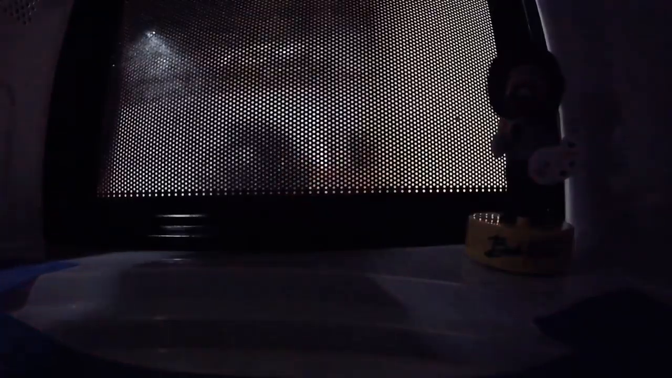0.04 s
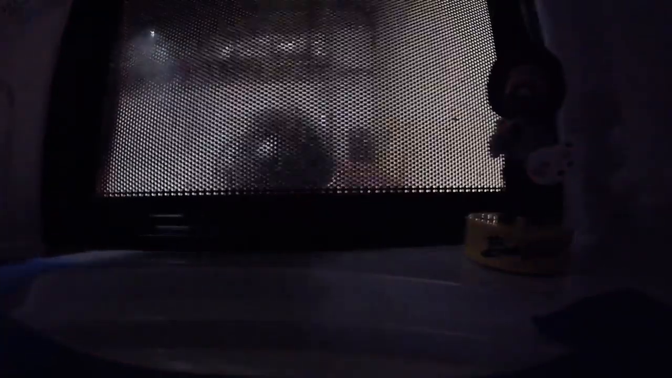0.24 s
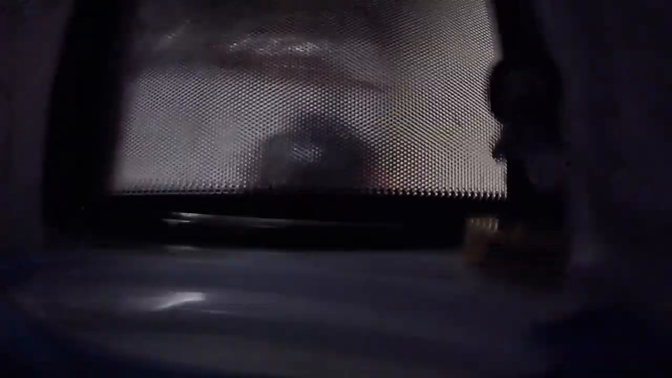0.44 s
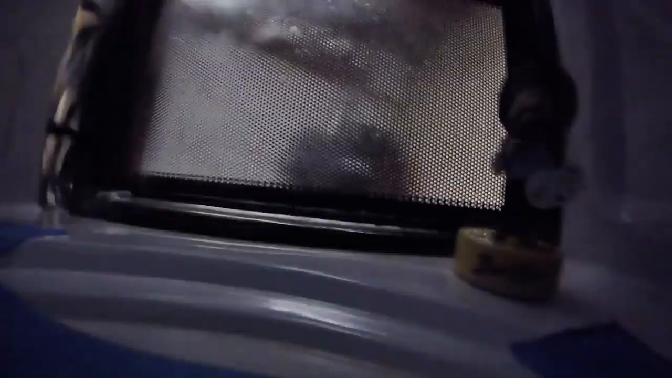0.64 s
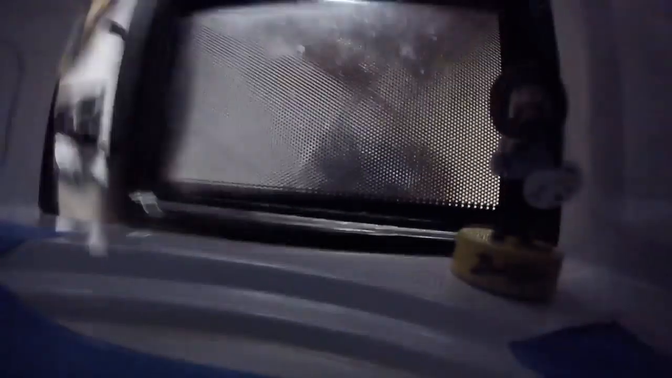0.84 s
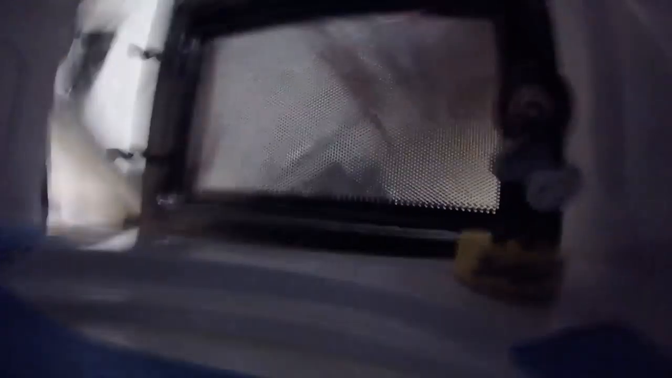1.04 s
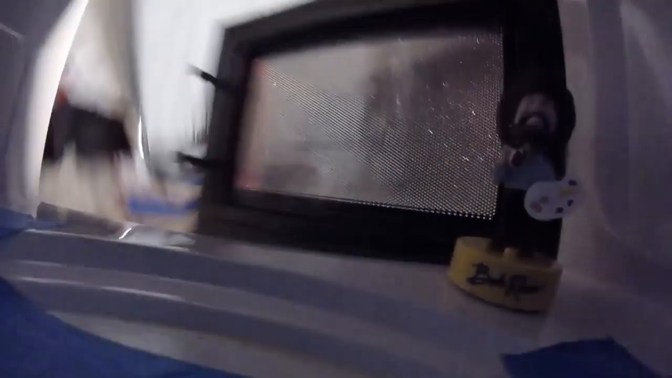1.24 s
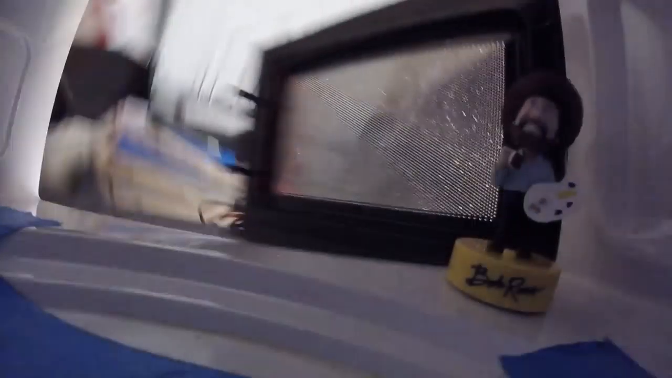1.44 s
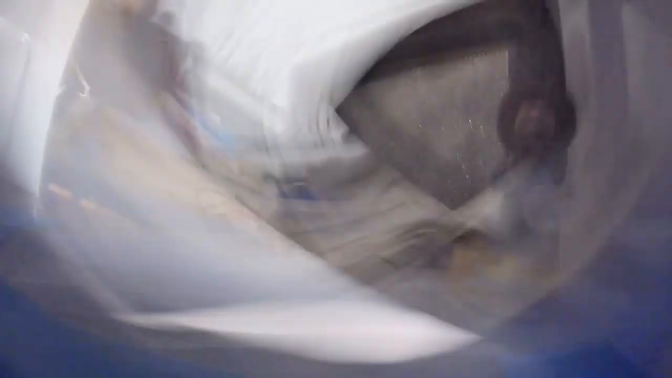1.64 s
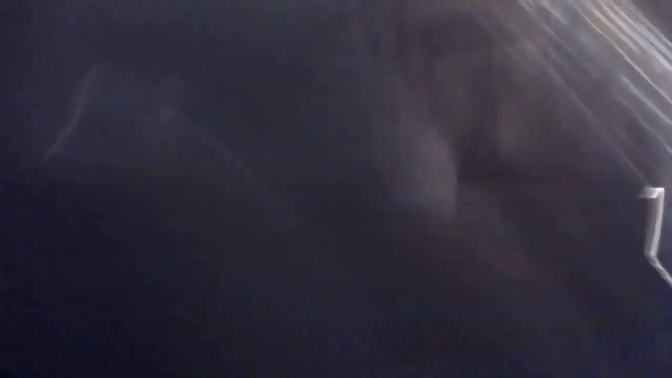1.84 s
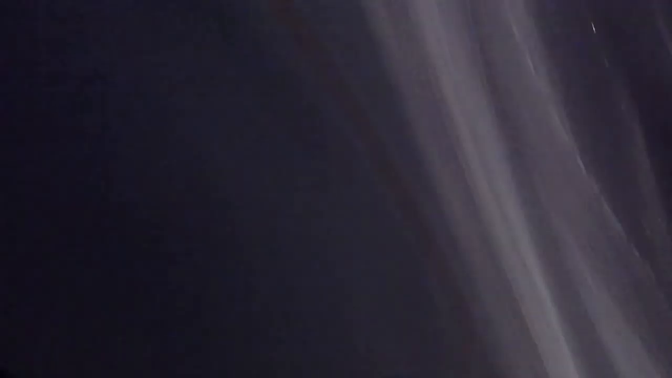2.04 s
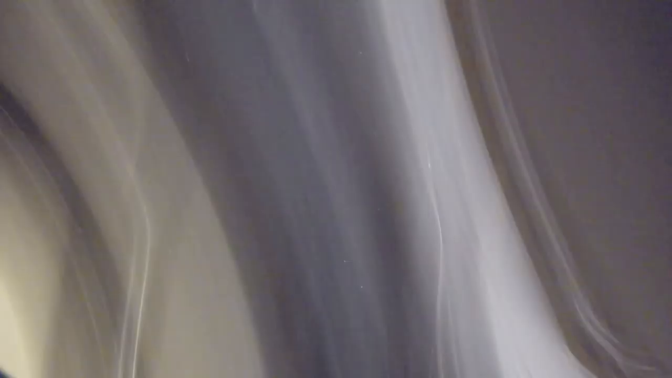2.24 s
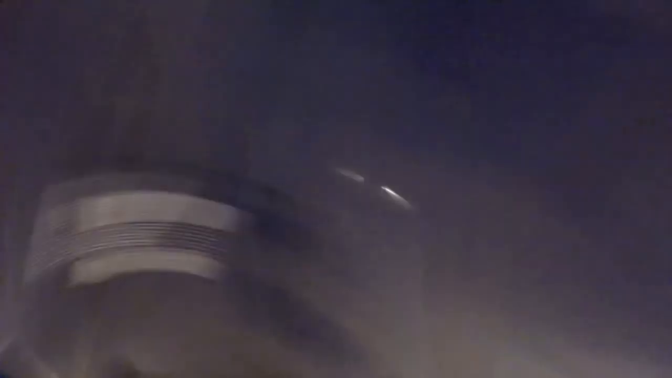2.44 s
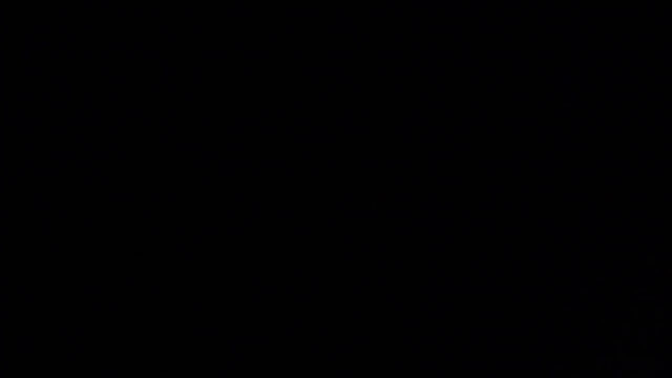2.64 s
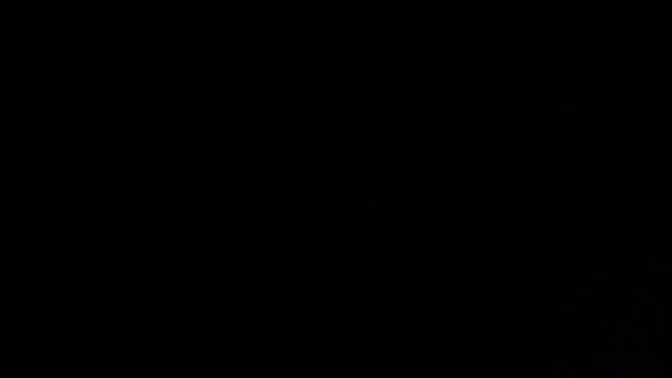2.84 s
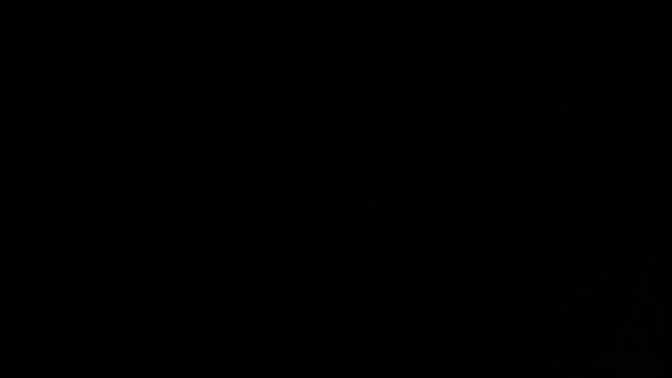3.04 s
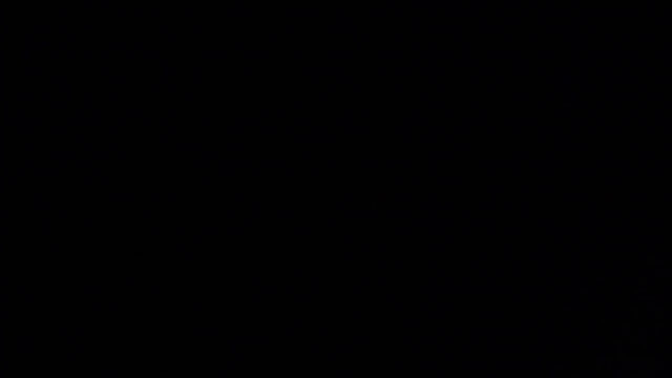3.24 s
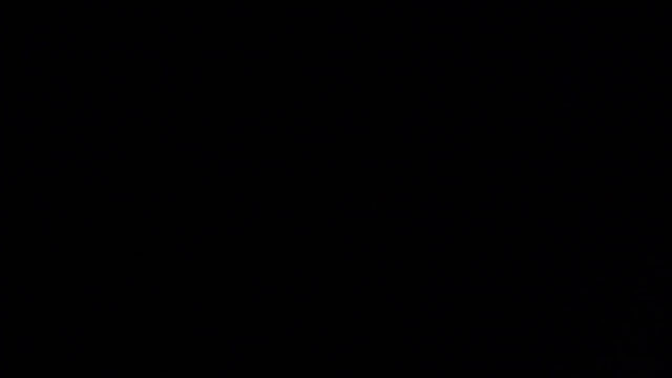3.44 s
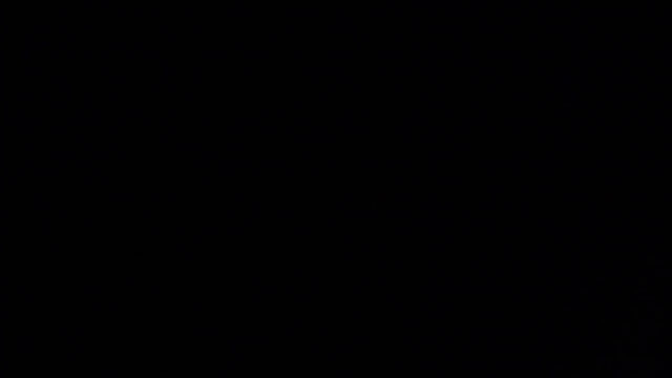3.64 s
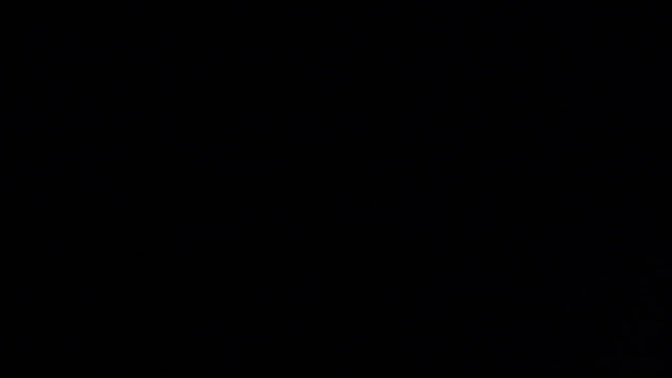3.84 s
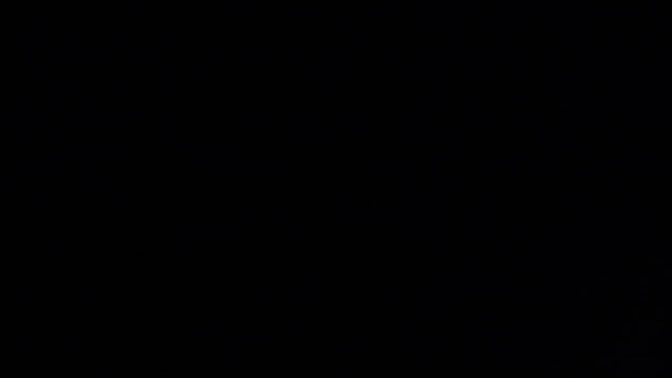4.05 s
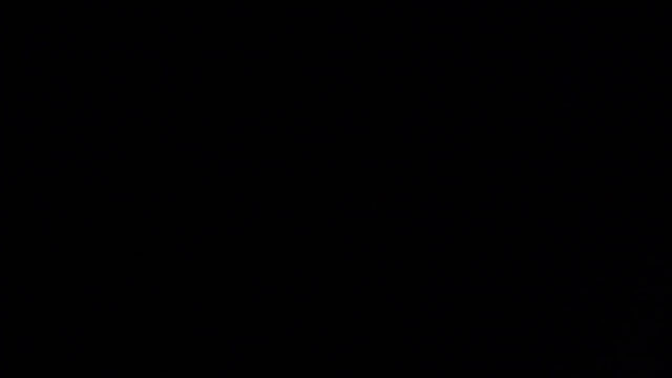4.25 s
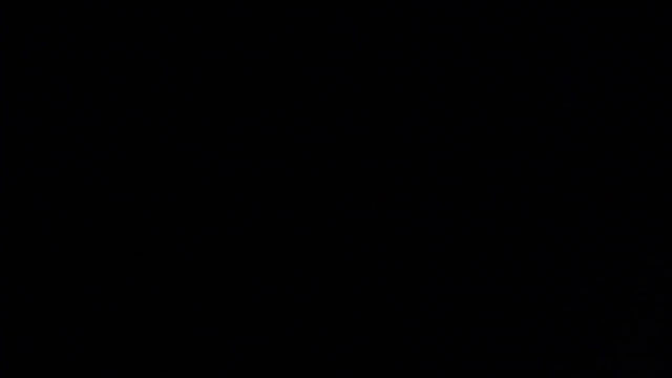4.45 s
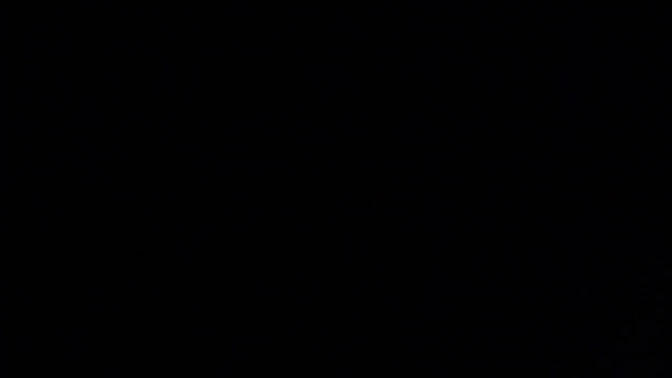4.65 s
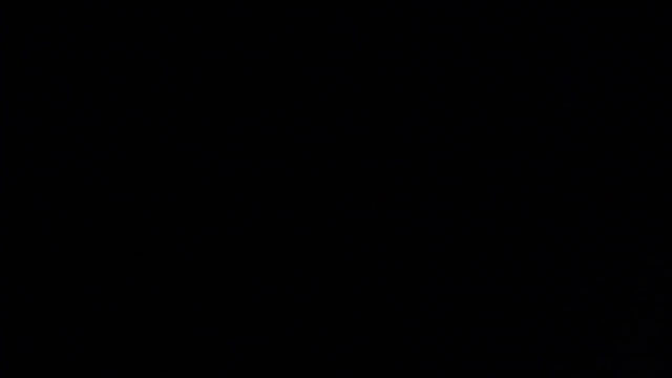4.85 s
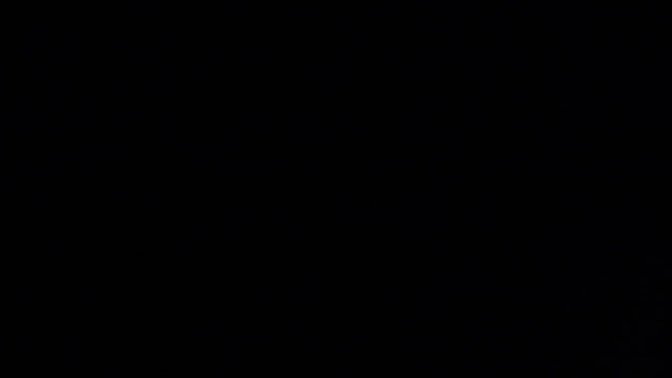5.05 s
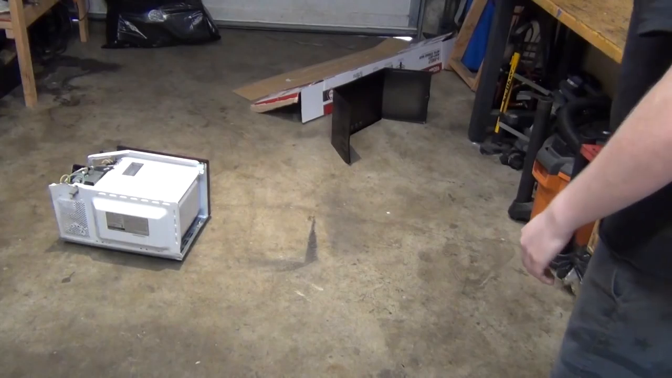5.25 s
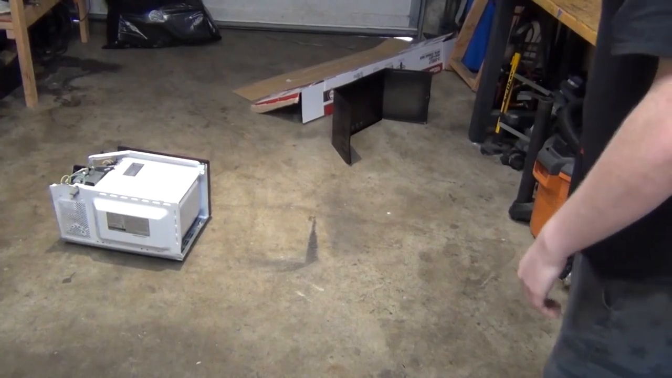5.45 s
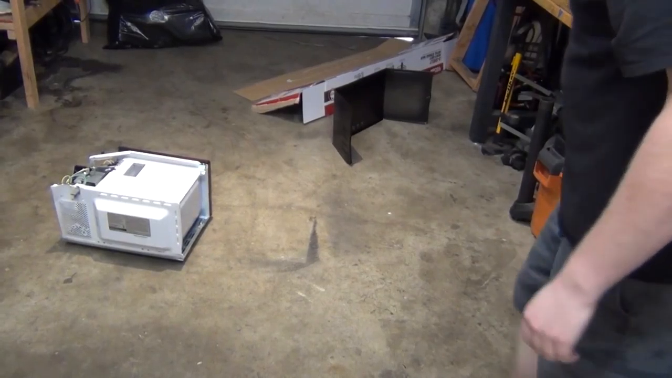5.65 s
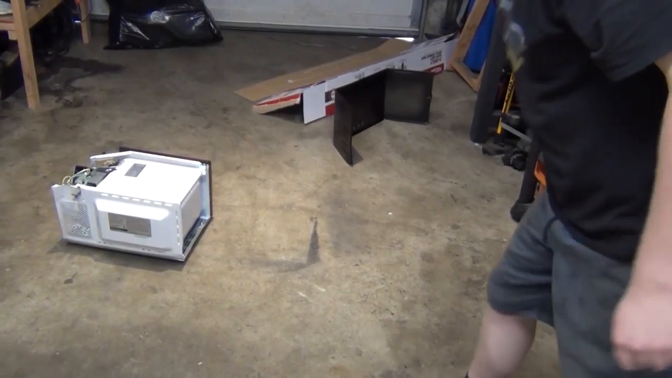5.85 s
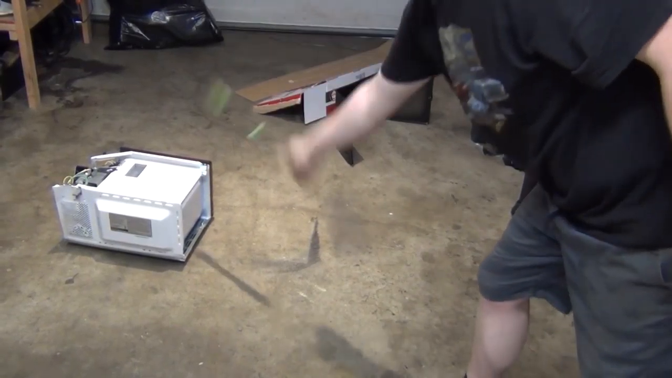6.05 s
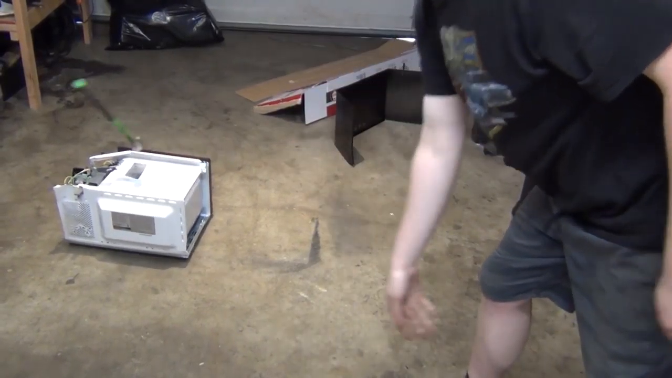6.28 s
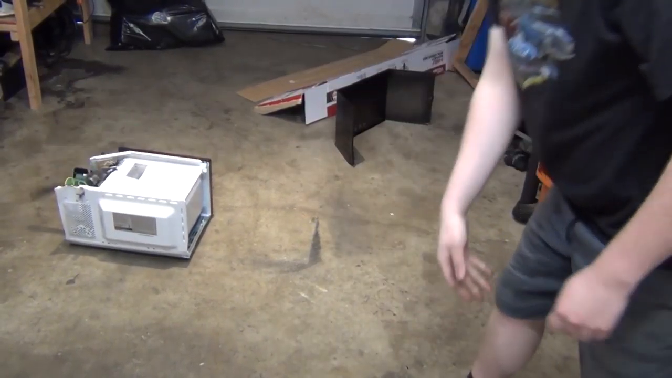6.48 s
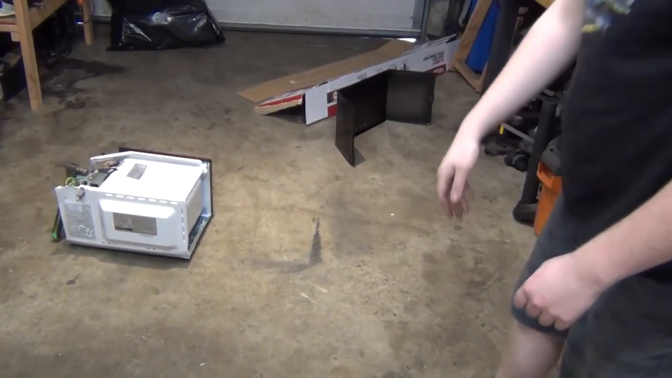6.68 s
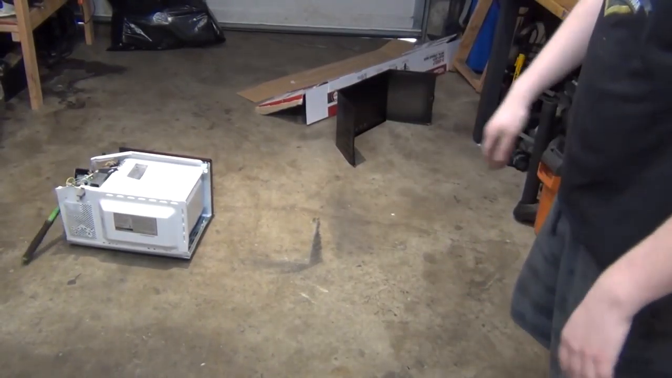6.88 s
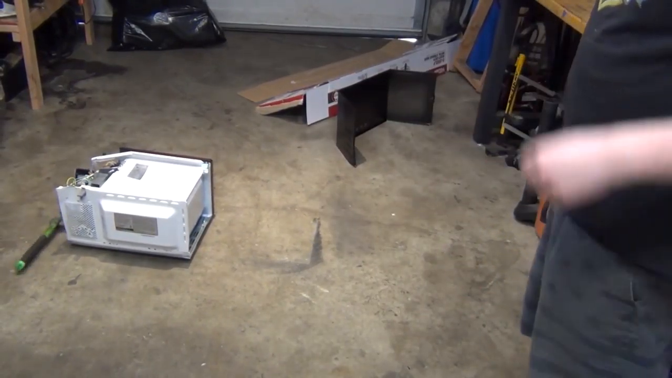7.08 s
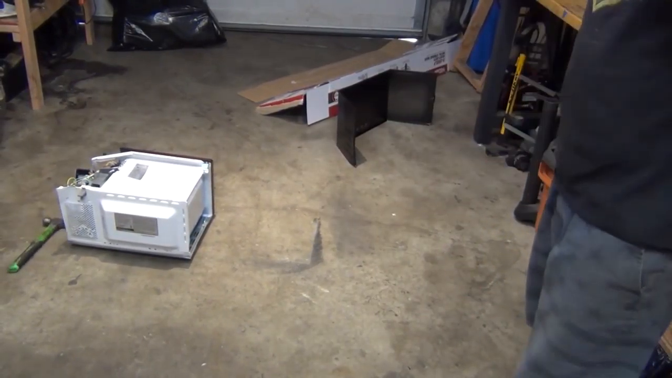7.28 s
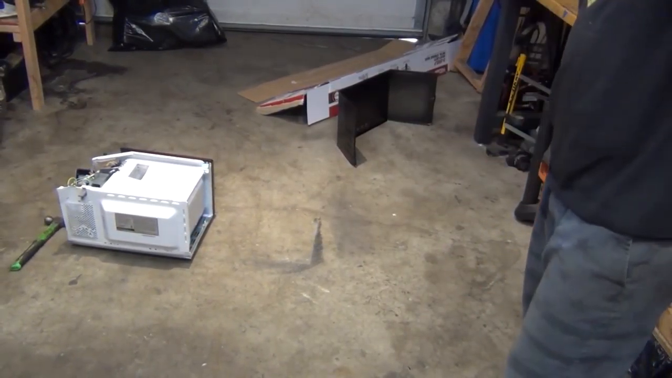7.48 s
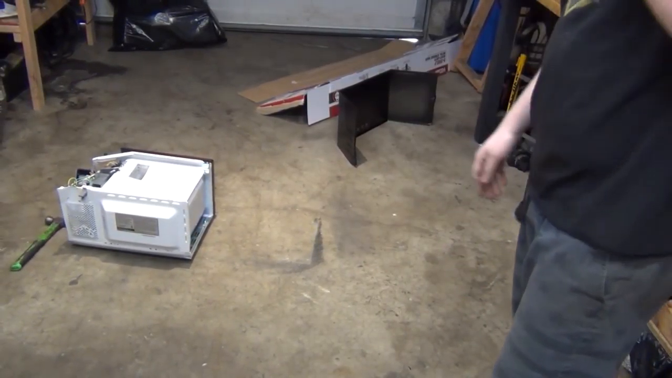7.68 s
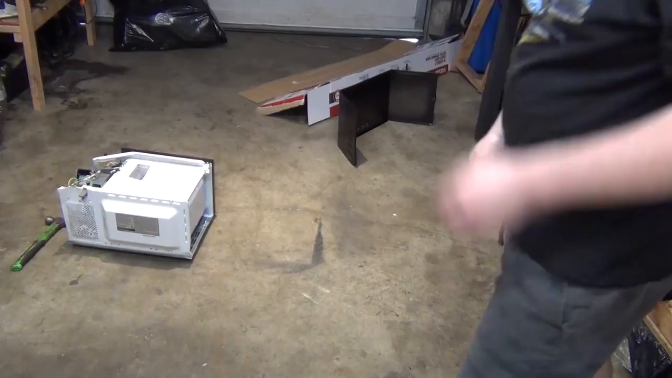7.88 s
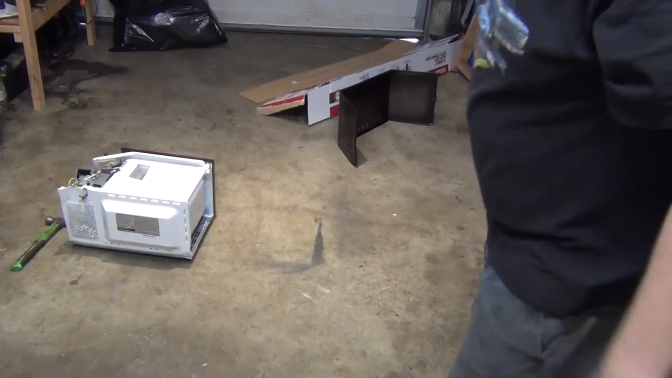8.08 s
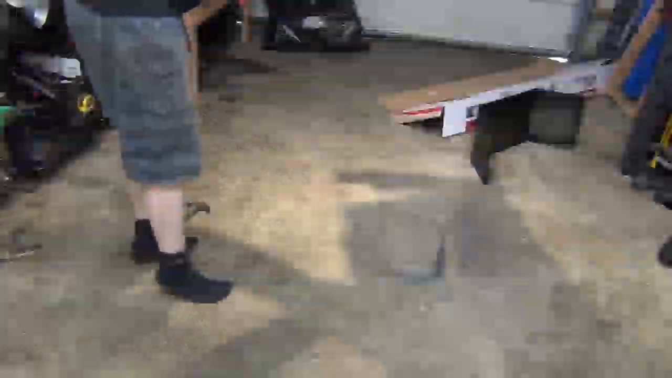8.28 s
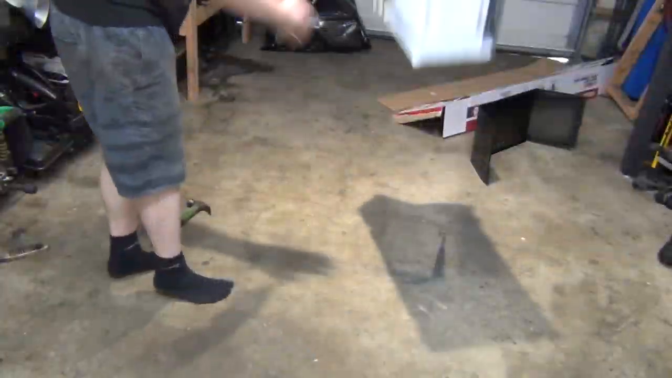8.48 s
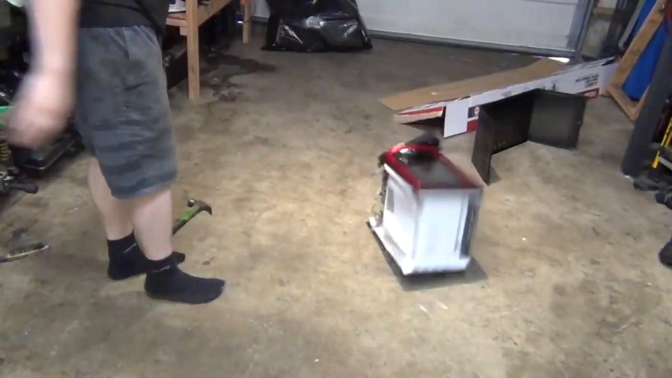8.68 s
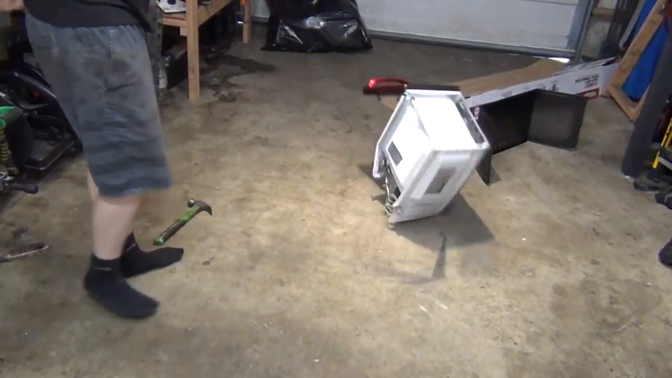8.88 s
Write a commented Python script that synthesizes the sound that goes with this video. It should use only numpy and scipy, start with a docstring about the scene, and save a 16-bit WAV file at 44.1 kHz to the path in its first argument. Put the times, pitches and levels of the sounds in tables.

```python
"""A hammer wrecks a sheet-metal oven in a garage, in short, hard-cut shots. First we ride a small camera
tumbling inside the oven, slowed down and dark: panels crumple, the hull booms, the housing gets knocked.
At 2.7 s the blows reach full speed and glass tinkles down. From 3.4 s we are outside, muffled, as the
thrown hammer bounces and rings on the concrete. At 5.2 s the sound opens up: the flipped hammer head
sings, socks scuff and more blows clang, until the oven is dropped at 8.3 s."""
import sys
import numpy as np
from scipy import signal
from scipy.fft import rfft, irfft, next_fast_len
from scipy.io import wavfile
from scipy.ndimage import uniform_filter1d

SR = 44100
rng = np.random.default_rng(int(sys.argv[2]) if len(sys.argv) > 2 else 0)


def log_audio(samples):
    """Write samples as a 16-bit WAV file to the path given in sys.argv[1]."""
    # one column per channel
    frames = np.atleast_2d(samples).T
    # limit to full scale, then quantise
    limited = np.clip(frames, -1, 1)
    pcm = np.round(limited * 32767).astype(np.int16)
    wavfile.write(sys.argv[1], SR, pcm)


N = 393372
HOP, FFT_SIZE = 32, next_fast_len(N + 4096)  # samples; envelopes move one hop a frame
BIN_HZ = np.fft.rfftfreq(FFT_SIZE, 1 / SR)

# blows and rattles inside the oven: (time [s], level [dB], bass [dB], treble [dB], t60 [ms])
INSIDE_BLOWS = [(0.001, -16.5, -8, 2, 1500), (0.198, -12.5, -12.5, 0.5, 430), (0.386, -11, 0, 1, 200),
                (0.402, -4.5, 4, -3.5, 430), (0.471, -7.5, 2.5, -12.5, 270),
                (0.579, -11.5, -0.5, 17.5, 160), (0.898, -20.5, -8.5, 4, 290),
                (0.924, -4.5, -4.5, 5.5, 370), (1.158, -14, -1, -12, 210), (1.249, -22, -2.5, 27, 270),
                (1.365, -17.5, -2.5, 37.5, 62), (1.708, -12.5, -14.5, 5, 260), (1.74, -10.5, 7, 15, 220),
                (1.897, -14.5, 15, -17, 180), (1.993, -9, -6, 16, 330), (2.034, -17, 1.5, -7, 260),
                (2.217, -17, -12.5, 11.5, 590), (2.284, -17, 3.5, 10, 200), (2.374, -16.5, 10, -23, 130),
                (2.439, -10.5, -10.5, 4, 100), (2.477, -3.5, -2, 1.5, 184), (2.778, -31, 4.5, -12, 370),
                (2.832, 3.5, 1, -3, 170), (2.879, -7.5, -8.5, -11.5, 710), (3.074, -20.5, 1.5, -3, 820),
                (3.239, -28, -17, -6, 100)]
# blows and bounces outside:
# (time [s], level [dB], bass [dB], treble [dB], t60 [ms], clang pitch [Hz], clang against level [dB])
OUTSIDE_BLOWS = [(3.45, -7.5, 14, -10.5, 470, 845, -23), (3.53, -11, -19, -12, 520, 2150, -11),
                 (3.725, -41, -4, 13, 180, 2740, -24), (3.759, -8, 6.5, -15.5, 590, 1577, -16),
                 (3.838, -13.5, -23, -13.5, 530, 2010, -11), (4.157, -17, 12.5, -15.5, 370, 1980, -3),
                 (4.235, -29, 15.5, -23, 680, 3060, -7), (4.455, -18.5, 17.5, -34, 460, 1610, -10),
                 (4.576, -7.5, 4.5, -4.5, 410, 3030, -8), (4.599, -9.5, 3, -5, 410, 2750, -10),
                 (4.683, -16.5, 13, 12.5, 410, 2490, -2.5), (4.768, -14, 3, -2.5, 640, 2800, -8),
                 (4.885, -23.5, 10.5, -8, 850, 2930, -10), (5.216, -1, 0.5, -18, 437, 999, -30),
                 (6.177, 9, 5, 4.5, 640, 1640, -35), (6.34, -4.5, 4, 1.5, 1040, 980, -24),
                 (6.562, -3.5, 11.5, 3.5, 670, 763, -11.5), (6.679, -8, 2.5, 2, 660, 1020, -30),
                 (6.879, -4.5, 4.5, 2, 510, 717, -12.5), (7.103, 2.5, -6, -5, 643, 1096, -16.5),
                 (7.264, -14, -6, -14, 170, 2070, -21), (7.37, -12, 2, 2.5, 690, 2860, -28),
                 (7.46, -14.5, 7, 6, 220, 2340, -29), (7.518, -14.5, -3, 4.5, 495, 2840, -14),
                 (8.034, -29, -3, -9.5, 160, 1110, -16.5), (8.285, -14, -3, 3.5, 1450, 1565, -19),
                 (8.312, 0.5, -8, -11, 420, 2180, -17.5), (8.522, -22, 14, 11.5, 1000, 1075, -8.5),
                 (8.552, -5.5, 16.5, 0, 750, 1900, -6.5), (8.693, -10, 15, -3.5, 1300, 2370, -7),
                 (8.747, 8, 14.5, 3.5, 870, 1153, -15)]


def gain_of(db):
    """Decibels to gain."""
    return 10 ** (np.asarray(db) / 20)


def unit_rms(x):
    """Scales to rms 1."""
    return x / np.sqrt(np.mean(x ** 2) + 1e-20)


def curve_at(points, hz):
    """Reads (Hz, value) points on a log-frequency axis."""
    point_hz, value = np.transpose(points)
    return np.interp(np.log(hz + 1), np.log(point_hz + 1), value)


def filtered(x, gain):
    """Applies one gain per frequency bin."""
    return irfft(rfft(x, FFT_SIZE) * gain, FFT_SIZE)[:N]


def coloured(x, points):
    """EQ through (Hz, dB) points, scaled so that white noise keeps its level."""
    return filtered(x, unit_rms(gain_of(curve_at(points, BIN_HZ))))


def add(mix, at, sound):
    """Mixes a sound in at a sample or frame index."""
    part = mix[..., round(at):][..., :sound.shape[-1]]
    part += sound[..., :part.shape[-1]]


def drone(peaks):
    """Noise through a few resonances."""
    gain = sum(gain_of(db) / (1 + (2 * (BIN_HZ - hz) / width) ** 2) for hz, width, db in peaks)
    return unit_rms(filtered(rng.standard_normal(N), gain))


def swells(pushes, rise_s):
    """Envelope of pushes that rise fast and die away."""
    t, power = np.arange(2 * SR) / SR, np.zeros(N)
    for s, db, t60 in pushes:
        add(power, s * SR, (gain_of(db - 60 * t / t60) * (1 - np.exp(-t / rise_s))) ** 2)
    return np.sqrt(power)


def wavering(hz, power, waver):
    """Sounds tones from their power per frame; echoes make each one waver."""
    a, b = uniform_filter1d(uniform_filter1d(rng.standard_normal((2,) + power.shape), 16), 16)
    swing = np.sqrt(power) * (1 - waver + waver * (unit_rms(a) + 1j * unit_rms(b)) / np.sqrt(2))
    carrier = np.exp(2j * np.pi * np.reshape(hz, (-1, 1)) * np.arange(power.shape[1] * HOP) / SR)
    return (np.repeat(swing, HOP, 1) * carrier).real.sum(0)


def struck_modes(hz, db, t60, blows, spread_db, waver):
    """Every blow (s, dB) strikes the same modes, each time in another place."""
    t, start = np.arange(1000) * HOP / SR, blows[0][0]
    power, out = np.zeros((len(hz), round((N / SR - start) * SR / HOP) + 1)), np.zeros(N)
    decay = gain_of(db[:, None] - 60 * t / t60[:, None]) * (1 - np.exp(-t / 0.0033))
    for (s, blow_db), place in zip(blows, rng.standard_normal((len(blows), len(hz)))):
        add(power, (s - start) * SR / HOP, (gain_of(blow_db + spread_db * place)[:, None] * decay) ** 2)
    add(out, start * SR, wavering(hz, power, waver))
    return out


def noise_beds():
    """A noise bed per perspective; in the slowed one, the oven's contents slide after each blow."""
    # EQ curves of the first four perspectives: (frequency [Hz], level [dB])
    bed_curves = [
        [(76, -45.5), (130, 2), (166, -10.5), (233, 2), (269, -11.5), (376, -4.5), (590, -10.5), (1090, -14.5),
         (1390, -22), (1860, -12), (2180, -21.5), (2350, -29), (3530, -44.5), (4200, -58), (5460, -91),
         (9240, -120)],
        [(24, -35), (40, -14), (262, -6), (364, -28), (3400, -23), (4610, -18), (9330, -37.5), (11000, -53),
         (14300, -65), (22000, -120)],
        [(18, -38), (30, 5), (173, -1), (249, 7.5), (302, 1), (1300, -12), (2830, -54), (4940, -14),
         (10000, -28), (13000, -57), (22000, -120)],
        [(12, -49), (20, -30), (117, -2), (178, -15.5), (250, 2), (313, -8.5), (463, -1.5), (518, -7.5),
         (2790, -23.5), (14600, -38), (16300, -32)],
    ]
    slowed, inside, dull, bright = (coloured(rng.standard_normal(N), curve) for curve in bed_curves)
    sliding = swells([(s, db - 15.5, 0.95) for s, db, *_ in INSIDE_BLOWS], rise_s=0.0088)
    return [slowed * sliding, inside, dull, bright, bright]


def garage_hum():
    """The faint, wavering drone of the garage."""
    # resonances: (frequency [Hz], width [Hz], level [dB])
    hum_peaks = [(119, 6.7, 0.5), (240, 26, 4.5), (462, 25, 1)]
    return gain_of(-55) * drone(hum_peaks)


def hull_boom():
    """The slowed oven booms each time it rocks."""
    # rocking pushes: (time [s], level [dB], t60 [s])
    rocks = [(0.03, -20.5, 0.81), (0.185, -12, 0.74), (0.39, -8, 1.05), (0.915, -13.5, 1.26),
             (1.17, -26, 3), (1.52, -21, 0.38), (1.72, -14.5, 0.53), (1.88, -23.5, 2.2), (2.37, -29, 8.6)]
    # hull resonance: (frequency [Hz], width [Hz], level [dB])
    hull = [(66, 66, 0)]
    return swells(rocks, rise_s=0.016) * drone(hull)


def housing_knocks():
    """A knock on the camera gives one low push and a faint ring of its housing."""
    # knocks: (time [s], level [dB], pitch [Hz], direction of the first swing [+1 or -1])
    knocks = [(1.764, -3, 72.5, 1), (1.895, 1.5, 101, -1), (1.911, 2, 199, -1), (1.926, -3.5, 124, 1),
              (2.378, -3.5, 140, -1), (2.444, -12, 90, 1)]
    out, t = np.zeros(N), np.arange(4000) / SR
    for s, db, hz, direction in knocks:
        push = direction * np.sin(2 * np.pi * hz * t) * np.exp(-1.3 * hz * t)
        ring = gain_of(-33.5 - 60 * t / 0.14) * np.sin(2 * np.pi * 430 * t)
        add(out, s * SR, gain_of(db) * (push + ring))
    return out


def falling_glass():
    """Each shard ticks and chimes briefly around its own pitch."""
    # landings: (time [s], level [dB], pitch [Hz])
    shards = [(3.0298, -13, 5330), (3.0733, -18.5, 5570), (3.114, -14, 5100), (3.161, -13, 5330),
              (3.2377, -22, 5750), (3.2825, -15, 5160), (3.335, -20.5, 5800), (3.3628, -32, 4740),
              (3.379, -23, 5530)]
    out, t = np.zeros(N), np.arange(1500) / SR
    for (s, db, hz), noise in zip(shards, rng.standard_normal((len(shards), len(t)))):
        chime = unit_rms(signal.lfilter(*signal.iirpeak(hz, 4, SR), noise)) * np.exp(-t / 0.013)
        tick = np.diff(noise, prepend=0) * np.exp(-t / 0.0041)
        add(out, s * SR, gain_of(db) * (0.27 * chime + 0.14 * tick))
    return coloured(out, [(1500, 11.5), (8000, -13), (10000, -14), (11000, -56)])


def hammer_flip():
    """Six clean tones of the steel head swell and dip as it turns, ever more slowly."""
    # head tones: (pitch [Hz], level [dB], t60 [s], start angle [turns], gain facing away [0-1])
    head_tones = [(2030, -40.5, 1.8, 0.0049, 0.65), (5000, -39, 0.58, 0.01, .7),
                  (5313, -26, 0.7, -0.06, .12), (8700, -36, .45, .28, 0.5), (9910, -27.5, 0.49, .22, 0.45),
                  (13430, -54, .42, -0.05, .5)]
    out, t = np.zeros(N), np.arange(0, 0.88, 1 / SR)
    turns = 1.104 * (1 - np.exp(-t / 0.16))
    bloom = np.sqrt(2) * (1 - np.exp(-t / 0.062)) * signal.windows.tukey(len(t), 0.04)
    for hz, db, t60, angle, away in head_tones:
        decay = gain_of(db - 60 * (t / t60) ** 1.83)  # dies ever faster
        facing = np.hypot(away, np.sin(2 * np.pi * (turns + angle)))
        add(out, 5.24 * SR, bloom * decay * facing * np.sin(2 * np.pi * hz * t))
    return out


def hammer_clinks():
    """The hammer rings on the concrete; each landing favours one of its modes."""
    # steel modes: (pitch [Hz])
    mode_hz = [1604, 2040, 2690, 3120, 3650, 4845, 4975, 5308, 6686, 7903, 8600]
    # the same modes: (level [dB], t60 [s])
    modes = [(-12, 0.48), (-14, 0.4), (-3.5, 0.44), (-8.5, 0.36), (-6, 0.36), (-7.5, 0.55), (-1.6, 0.46),
             (-16, 0.65), (-14.5, 0.51), (-14.5, 0.56), (-11, 0.15)]
    # landings: (time [s], level [dB], high modes over low [dB], favoured mode [Hz])
    clinks = [(3.452, -25, -5, 4845), (3.53, -22, -16, 4845), (3.764, -19, -4, 1604),
              (3.842, -26, -4, 3650), (4.158, -27, -5, 3060), (4.457, -34, -1, 4845),
              (4.578, -18, -13, 4975), (4.595, -11, 3, 7903), (4.687, -15.5, 2, 6686),
              (4.77, -25, -7, 4975), (4.887, -23.5, -7, 2690), (5.215, -29.5, 1.5, 2040),
              (6.682, -30, 6, 2690), (6.879, -24.5, -18, 3120), (7.106, -19.5, -6, 2690),
              (7.371, -19, -4, 4975), (7.463, -16, -2, 7903), (7.521, -24.5, -2, 2690)]
    hz, blows = np.array(mode_hz), []
    for s, db, tilt_db, struck_hz in clinks:
        tilt = curve_at([(3000, -tilt_db / 2), (7900, tilt_db / 2)], hz)
        accent = 6.5 * np.exp(-(np.log(hz / struck_hz) / 0.022) ** 2)
        blows.append((s, db + tilt + accent))
    return struck_modes(hz, *np.transpose(modes), blows, spread_db=1.5, waver=0.72)


def steel_cracks():
    """Steel first touches a hard face: a bright spike of about a millisecond."""
    # contacts: (time [s])
    contacts = [6.178, 6.564, 7.107, 7.373, 7.461, 8.317, 8.554, 8.695]
    out, t = np.zeros(N), np.arange(200) / SR
    band = signal.butter(2, [1800, 6000], "band", fs=SR)
    for s, noise in zip(contacts, rng.standard_normal((len(contacts), len(t)))):
        spike = signal.lfilter(*band, noise * np.exp(-t / 0.0007))
        add(out, s * SR, gain_of(-3) * spike / abs(spike).max())
    return out


def oven_clangs():
    """Each blow rings the oven's panels and adds its own clang tone with a lower partner."""
    # panel modes: (pitch [Hz], level [dB], t60 [s])
    panels = [(322, -5.5, 0.65), (690, -26.5, 0.54), (690, -25, 0.93), (867, 0.5, 0.59), (954, -16, 0.36),
              (1200, -12, 0.88)]
    blows = [(s, db + clang_db - 9) for s, db, *_, clang_db in OUTSIDE_BLOWS]
    out = struck_modes(*np.transpose(panels), blows, spread_db=-2.5, waver=0.5)
    t_ms, pair_db = 1000 * np.arange(400) * HOP / SR, np.array([[0], [-0.5]])
    for s, db, _, _, t60, hz, clang_db in OUTSIDE_BLOWS:
        power = gain_of(db + clang_db + pair_db - 60 * t_ms / t60) ** 2 * (1 - np.exp(-t_ms / 9.6))
        add(out, s * SR, wavering([hz, 0.83 * hz], power, waver=0.49))
    return out


def clatter(bursts, room_db):
    """Crumpling metal: dense noise bursts whose top end dies first, over the tail of the room."""
    # decay across the spectrum: (frequency [Hz], t60 scale [factor])
    decay_scale = [(150, 0.89), (1000, 1.04), (4000, 1.094), (8000, 0.72), (16000, 0.48)]
    # garage reverb: (frequency [Hz], t60 [s])
    room_t60 = [(150, 0.79), (1000, 0.52), (5000, 0.56), (16000, 0.19)]
    hz, t = np.fft.rfftfreq(4 * HOP, 1 / SR)[:, None], np.arange(1000) * HOP / SR
    power = np.zeros((len(hz), N // HOP + 4))
    room = gain_of(room_db - 60 * t / curve_at(room_t60, hz)) ** 2 * (1 - np.exp(-t / 0.015))
    for s, level_db, bass_db, treble_db, t60_ms, rise_ms, *band in bursts:
        db = level_db + curve_at([(250, bass_db), (1500, 0.0086), (8000, treble_db)], hz)
        if band:
            band_hz, band_db = band
            db = db + band_db * np.exp(-(np.log((hz + 1) / band_hz) / 0.69) ** 2)
        decay = gain_of(-60 * 1000 * t / (t60_ms * curve_at(decay_scale, hz))) ** 2
        attack = 1 - np.exp(-(1000 * t + 0.1) / rise_ms)
        add(power, s * SR / HOP, (gain_of(db) * attack) ** 2 * (decay + room))
    a, b, grit = rng.standard_normal((3, power.shape[1], len(hz))).transpose(0, 2, 1)
    noise, frames = a + 1j * b, dict(nperseg=4 * HOP, noverlap=3 * HOP)
    chatter_db = unit_rms(uniform_filter1d(uniform_filter1d(grit, 24, 0), 6, 1))  # loose parts
    noise_peak = 3 * np.std(signal.istft(noise[:, :500], **frames)[1])
    return signal.istft(np.sqrt(power) * gain_of(chatter_db) * noise, **frames)[1][:N] / noise_peak


def sheet_metal(x, ripple_db):
    """Hundreds of close modes: narrow random peaks and dips that ring only after the blow."""
    ripple = uniform_filter1d(uniform_filter1d(rng.standard_normal(len(BIN_HZ)), 240), 240)
    echoes = irfft(ripple_db * unit_rms(ripple) * np.log(10) / 20, FFT_SIZE)
    echoes[1:FFT_SIZE // 2] *= 2  # folding onto positive delays makes the filter causal
    echoes[FFT_SIZE // 2 + 1:] = 0
    gain = np.exp(rfft(echoes))
    return filtered(x, gain / np.sqrt(np.mean(abs(gain) ** 2)))


def crumple_inside(rise_ms=1.2):
    """The panels buckle and rattle all around us."""
    blows = [(*blow, rise_ms) for blow in INSIDE_BLOWS]
    return sheet_metal(clatter(blows, room_db=-15.5), ripple_db=3)


def crumple_outside(blow_rise_ms=1.7, scuff_rise_ms=18.4, lift_db=3.5, scuff_bass_db=-8):
    """Blows crunch around their clang pitch; between them socks scuff on the concrete."""
    # scuffs: (time [s], level [dB], treble [dB], t60 [ms], band centre [Hz], band gain [dB])
    scuffs = [(5.571, -27.5, -9, 570, 2070, 8.5), (5.789, -26, 7.5, 290, 4000, -4.5),
              (6.065, -41, 28, 570, 6000, -6), (7.77, -43, 19, 260, 7000, -1),
              (8.048, -40.5, 10.5, 330, 7000, 5.5)]
    bursts = [(*blow, blow_rise_ms, hz, lift_db) for *blow, hz, _ in OUTSIDE_BLOWS]
    bursts += [(s, db, scuff_bass_db, treble, t60, scuff_rise_ms, *band)
               for s, db, treble, t60, *band in scuffs]
    return sheet_metal(clatter(bursts, room_db=-16), ripple_db=2)


def scene():
    """Each shot hears the sources from its own perspective; the cuts are abrupt."""
    # shots: (start [s], end [s], perspective [index])
    # 0 inside slowed, 1 inside, 2 outside dull, 3 outside bright, 4 outside for the drop
    shots = [(0, 1.615, 0), (1.703, 2.715, 0), (2.715, 2.79, 1), (2.829, 3.449, 1), (3.449, 5.215, 2),
             (5.215, 8.283, 3), (8.283, 9, 4)]
    # noise bed of each shot: (level [dB])
    bed_levels = [0, -3.5, -90, -47.5, -56, -46, -28.5]
    # EQ curve of the crumple for each perspective: (frequency [Hz], level [dB])
    crumple_curves = [
        [(76, -20.5), (130, 5), (265, -8.5), (302, 2), (335, -8.5), (416, -4), (474, -8), (766, -8.5),
         (836, -12), (1410, -17.5), (1700, -12), (2120, -19.5), (2380, -30), (3790, -50), (4200, -58),
         (5460, -86), (9240, -120)],
        [(24, -67), (40, -26), (92, -9), (166, -6), (260, -3.5), (322, -12), (398, -6.5), (555, -13.5),
         (870, -13.5), (3780, -25.5), (5520, -16.5), (9740, -44.5), (11500, -63), (15000, -102), (22000, -120)],
        [(35, -25), (60, -15), (467, -8.5), (1410, -10.5), (1600, -1.5), (2260, -4), (2810, 1.5), (3410, -4),
         (4930, 3), (6820, -13.5), (7270, -37), (8100, -25), (10500, -64), (13600, -76), (22000, -120)],
        [(24, -51), (40, -28), (101, -34.5), (130, -8.5), (264, -10), (339, -2), (561, -9.5), (637, -9.5),
         (1880, -7.5), (5010, -14.5), (14100, -31), (16300, -46)],
        [(24, -50), (40, -28), (245, -12.5), (561, -9), (861, -7), (1030, -6.5), (1570, -3), (4640, -6.5),
         (14800, -21.5), (16300, -48)],
    ]
    # muffling of the rings in the dull perspective: (frequency [Hz], gain [dB])
    dull_curve = [(4000, -9.5), (6500, -6.5), (8000, -18), (10000, -12)]
    t = np.arange(N) / SR
    inside, outside = crumple_inside(), crumple_outside()
    crumples = [coloured(x, curve) for x, curve in zip([inside] * 2 + [outside] * 3, crumple_curves)]
    rings = hammer_clinks() + oven_clangs() + steel_cracks()
    muffled = filtered(rings, gain_of(curve_at(dull_curve, BIN_HZ)))
    hum = garage_hum()
    details = [hull_boom() + housing_knocks(), falling_glass(),
               muffled + hum, rings + hammer_flip() + hum, rings + hum]
    beds = noise_beds()
    out = gain_of(-10.5) * hum * (t < 2.829)  # a trace of hum bridges the gaps between early shots
    for (start, end, view), bed_db in zip(shots, bed_levels):
        gate = np.clip(np.minimum(t - start, end - t) / 0.00073 + 0.5, 0, 1)
        out += gate * (crumples[view] + details[view] + gain_of(bed_db) * beds[view])
    return out[None]


def record(dry):
    """The loudest blows overload the input; the slowed shots have a lower band limit."""
    ceiling, knee = 0.85, 5
    slowed_hz, full_hz, slowed_end_s = 3950, 16400, 2.715
    clipped = dry / (1 + abs(dry / ceiling) ** knee) ** (1 / knee)
    lowpasses = (signal.firwin(511, hz, window=("kaiser", 9), fs=SR) for hz in (slowed_hz, full_hz))
    slowed, full = (signal.oaconvolve(clipped, taps[None], "same") for taps in lowpasses)
    return np.where(np.arange(N) < slowed_end_s * SR, slowed, full)


dry = scene()
out = record(dry)
log_audio(out)
```